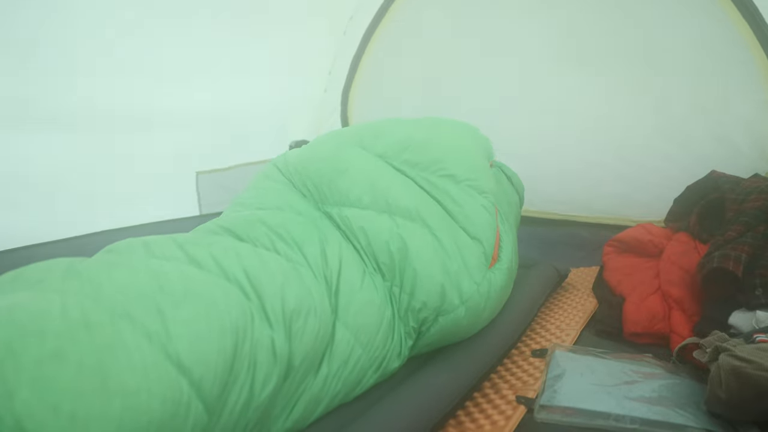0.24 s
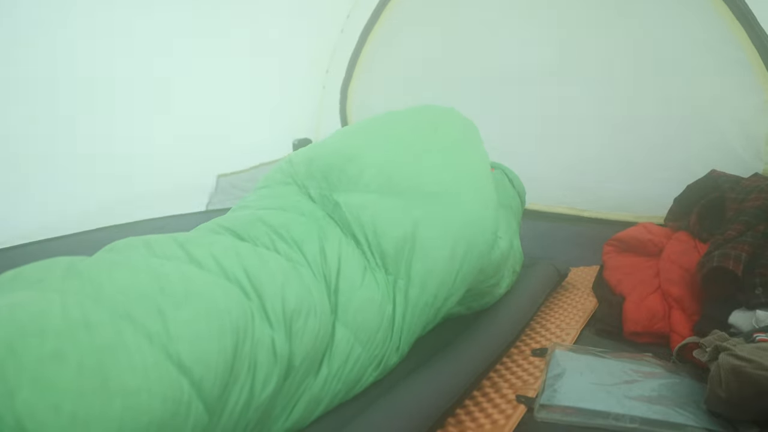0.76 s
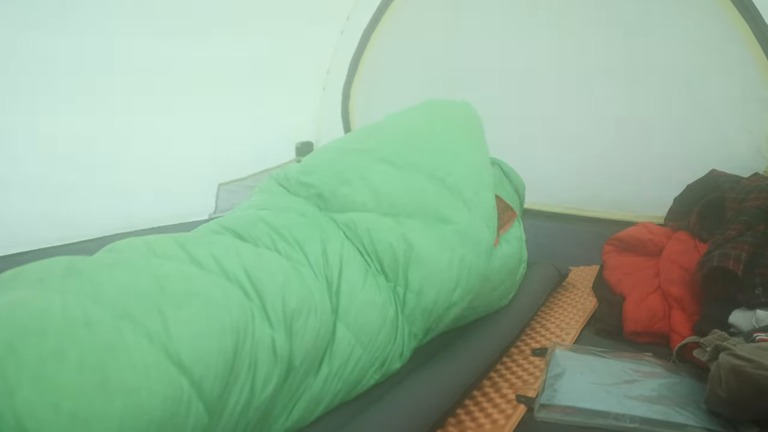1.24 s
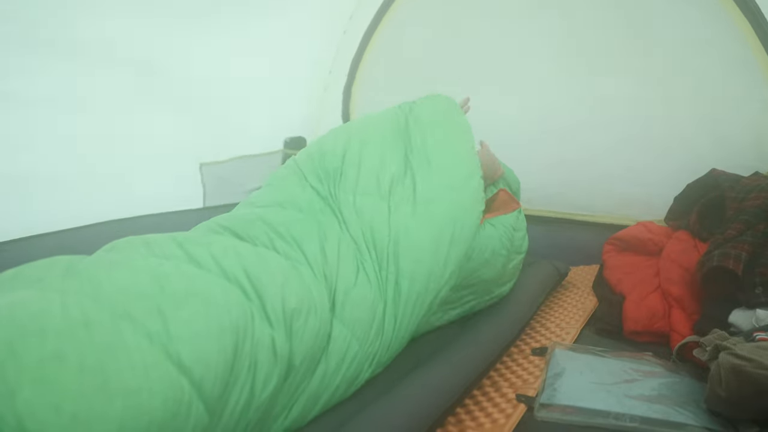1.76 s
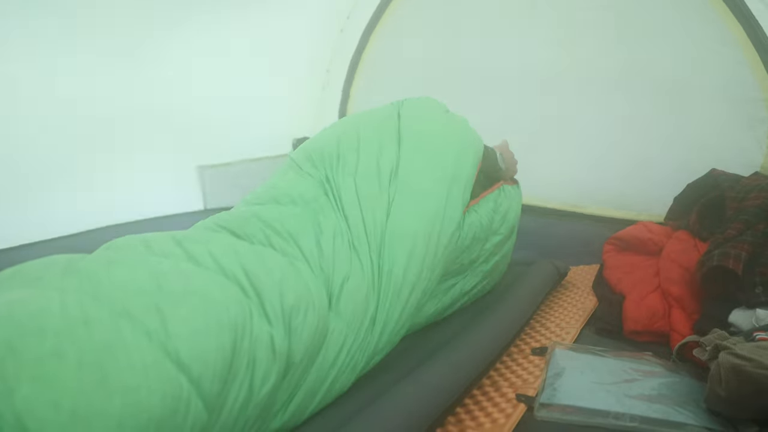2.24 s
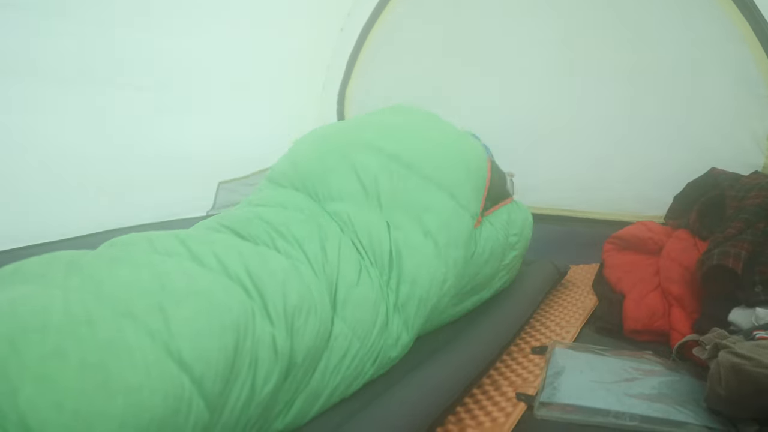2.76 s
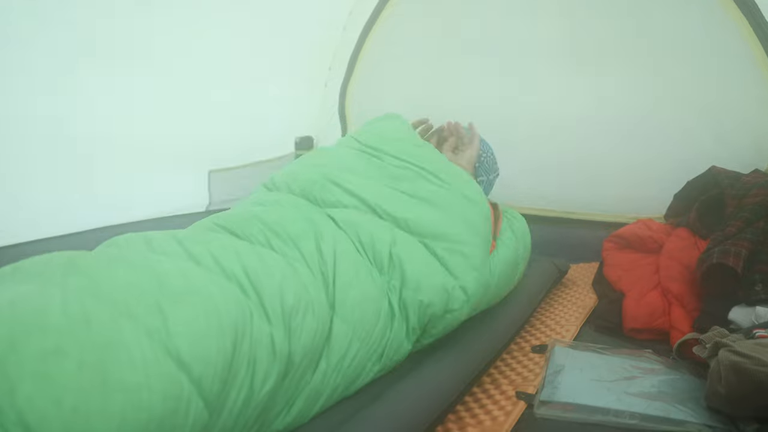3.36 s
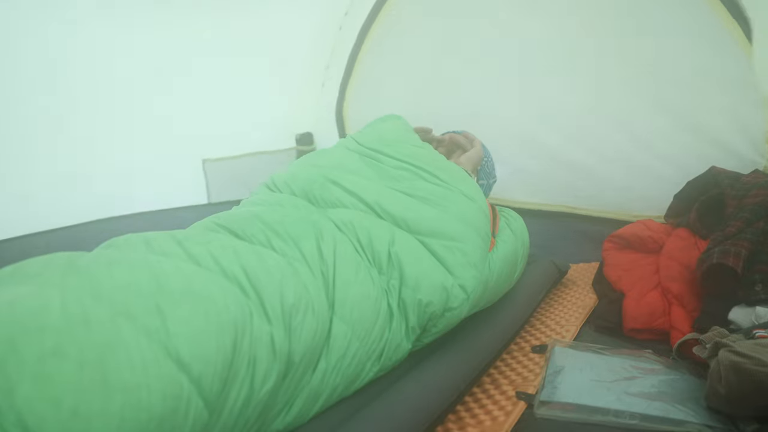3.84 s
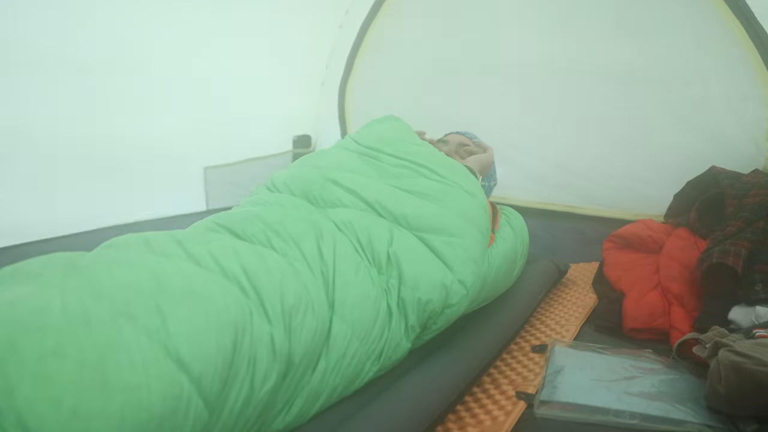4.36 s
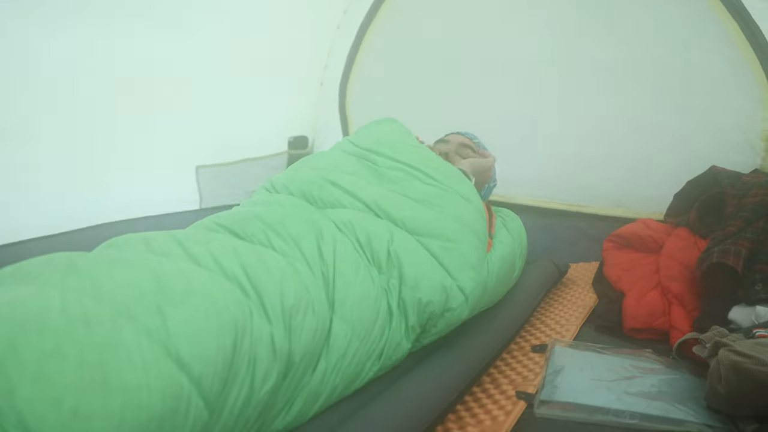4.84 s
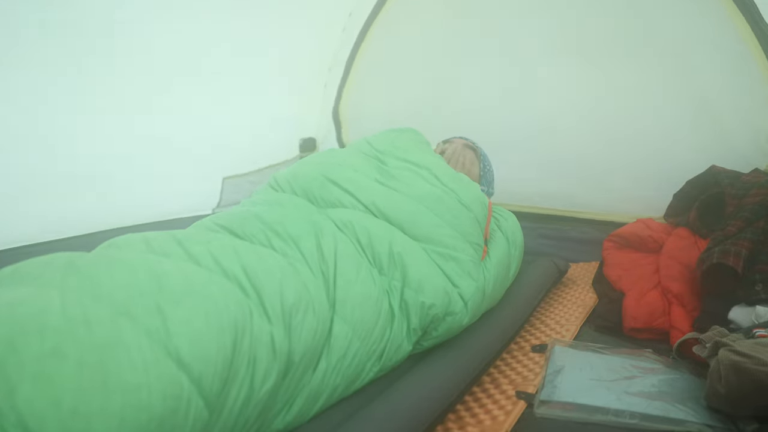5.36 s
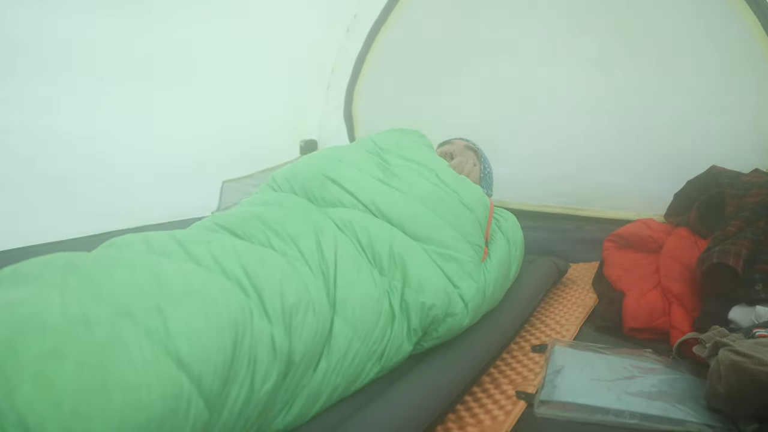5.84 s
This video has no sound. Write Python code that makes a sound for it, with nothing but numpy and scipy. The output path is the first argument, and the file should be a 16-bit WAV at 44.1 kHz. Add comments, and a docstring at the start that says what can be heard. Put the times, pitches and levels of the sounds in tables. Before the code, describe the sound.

Inside a tent, gusts drum on the walls with a low rumble, making the fabric flap and crackle and small zip pulls rattle.

```python
"""Strong wind rumbles against a tent, heard from inside, while the nylon flaps, rustles and snaps taut.
Gusts drum on the walls and make them heave, pumping the air too slowly to hear as a tone.
Metal zip pulls tinkle, cloth squeaks on a pole and a sleeping bag brushes over the mat.
Behind it all is a faint wash of wind outside. A small microphone with two openings gives left and right."""
import sys
import numpy as np
from scipy import signal
from scipy.fft import rfft, irfft, next_fast_len
from scipy.io import wavfile
from scipy.ndimage import uniform_filter1d

SR = 44100
rng = np.random.default_rng(int(sys.argv[2]) if len(sys.argv) > 2 else 0)


def transcribe(u):
    """Save the signal u as a 16-bit wav file named by the first command-line argument.

    u: samples, shape (n,) or (channels, n), limited to [-1, 1]; the rate is SR.
    q: integer samples, one column per channel.
    """
    v = np.clip(np.atleast_2d(u).T, -1, 1)
    q = np.round(v * 32767).astype(np.int16)
    wavfile.write(sys.argv[1], SR, q)


N = 268789

# Tone colours of the noises. Each row: frequency in Hz, relative strength in dB.
RUMBLE_COLOUR = [(11, -63), (18, -16), (25, -15), (43, -14.5), (140, -28), (180, -105), (310, -120)]  # deep drumming of the wind
THUD_COLOUR = [(65, -53), (110, 4.5), (279, -4), (474, -19), (550, -17.5), (720, -20), (1210, -120)]  # thudding cloth
RUSTLE_COLOUR = [(260, -4.5), (450, -1.5), (639, -6), (800, -3), (1000, -7.5), (1970, -12), (3300, -20),
                 (4290, -27), (7260, -120)]  # middle range of the moving nylon
HISS_COLOUR = [(800, -39), (1650, 1), (2800, -6.5), (5100, -3), (9500, -2), (11500, -5.5), (12600, -41),
               (14000, -52)]  # its treble
TOP_HISS_COLOUR = [(8000, -55), (10500, -58), (12000, -4), (13500, -12), (15000, -12), (15800, -31),
                   (17000, -60)]  # its very highest treble
SWAY_COLOUR = [(1, -20), (3, 0), (8, 0), (16, -6), (24, -20), (40, -60), (80, -140)]  # slowly swaying walls
WASH_COLOUR = [(300, -23), (600, -9), (2000, -7), (4000, -21), (10000, -17), (12500, -22), (15500, -32)]  # outside wind, heard through the walls
# How alike the two sides of a noise are. Each row: frequency in Hz, likeness (1 same, 0 unrelated).
SIDE_LIKENESS = [(60, 0.94), (130, 1), (290, 0.84), (640, 0.25), (1410, -0.066), (3100, -0.21),
                 (6820, 0.23), (15000, -0.35)]
# Wind drumming on the walls. Each row: time in seconds, rumble level in dB.
GUST_LEVELS = [(0.0, -43), (0.69, -41.5), (0.81, -35), (0.94, -43.5), (1.16, -36.5), (1.92, -38.5),
               (2.0, -28.5), (2.19, -38.5), (2.84, -39.5), (3.11, -42), (3.25, -39.5), (3.63, -31.5),
               (3.78, -37), (3.95, -35), (4.47, -38), (4.54, -38), (5.52, -38.5), (6.04, -38.5)]
# Single shoves of wind that swell the rumble. Each row: middle in seconds, length in seconds, level in dB.
BUFFETS = [(0.056, 0.035, -62), (0.576, 0.15, -30), (0.956, 0.07, -32.5), (1.288, .07, -53),
           (1.456, 0.069, -53), (1.83, .09, -37), (1.91, 0.058, -32), (2.006, 0.067, -40),
           (2.157, 0.19, -38.5), (2.274, 0.18, -31.5), (3.272, 0.083, -31.5), (3.54, .08, -33),
           (3.712, 0.044, -32), (3.855, 0.069, -25), (4.174, 0.29, -35.5), (4.538, 0.13, -26),
           (5.03, .06, -34.5), (5.995, 0.11, -37.5)]
# Dull flaps of cloth. Each row: start in seconds, level in dB, centre frequency in Hz.
FLAPS = [(0.554, -30, 185), (1.056, -23, 187), (1.834, -27, 188), (2.003, -27.5, 214), (2.154, -29.5, 190),
         (2.22, -34, 240), (3.079, -37.5, 196), (3.16, -29.5, 172), (3.236, -25.5, 201), (3.61, -30.5, 175),
         (3.823, -29, 244), (3.911, -31.5, 220), (4.152, -45, 196), (4.197, -31.5, 176), (4.48, -23.5, 147),
         (4.618, -26.5, 315), (4.693, -29, 164), (4.53, -31, 200), (5.004, -27, 196), (5.25, -31, 190),
         (5.392, -55, 230), (5.704, -29, 194)]
# Nylon in constant motion. Each row: time in seconds, rustle level in dB, hiss level in dB.
CLOTH_LEVELS = [(0.0, -73, -69.5), (0.39, -60, -70.5), (0.64, -47, -57.5), (0.96, -55.5, -65),
                (1.56, -56, -61), (1.97, -48.5, -60.5), (2.36, -51, -62), (2.59, -64.5, -62.5),
                (2.95, -60, -64.5), (3.15, -67, -63), (3.43, -57, -66), (3.71, -50.5, -54.5),
                (4.21, -56, -65.5), (4.43, -55, -58.5), (4.99, -58.5, -69), (5.43, -58, -62),
                (5.92, -60, -71), (6.09, -55.5, -63)]
# Nylon rubbing on nylon. Each row: middle in seconds, length in seconds, rustle level in dB,
# hiss level in dB, left minus right in dB.
STROKES = [(0.144, 0.079, -61, -61.5, 0), (0.267, 0.043, -52.5, -69, 0), (0.33, 0.03, -55, -64, -2),
           (.43, 0.056, -54, -59.5, 1), (0.563, 0.058, -41, -54, -6), (0.67, 0.039, -46, -63, -1),
           (0.801, .06, -45, -56.5, -1), (0.925, 0.023, -55, -75, 2), (1.063, 0.025, -45.5, -77, 1),
           (1.197, 0.1, -53, -65, -2), (1.54, 0.025, -45.5, -63, -4), (1.77, 0.06, -47, -74, -1),
           (1.857, 0.074, -44, -58, -2), (1.95, 0.11, -58, -58, 2), (2.147, 0.17, -62, -59.5, 4),
           (2.217, 0.072, -44.5, -50, 3), (2.308, .04, -48.5, -56.5, 4), (2.36, 0.046, -54.5, -58, -3),
           (2.49, 0.17, -50, -55, 1), (2.78, 0.25, -55.5, -81, -1), (3.142, 0.078, -51, -76, 1),
           (3.241, 0.061, -52.5, -75, -4), (3.325, 0.07, -48.5, -62, 0), (3.534, 0.084, -41.5, -49.5, -1.5),
           (3.618, 0.13, -48, -69, 1), (3.724, 0.057, -60, -62, 7), (3.798, 0.022, -57, -48.5, -2),
           (3.858, 0.043, -39.5, -52, -3.5), (3.933, 0.051, -50.5, -52.5, -1), (4.078, 0.041, -50, -58, 2),
           (4.195, 0.069, -46, -52.5, -1), (4.274, 0.06, -52, -63.5, -2), (4.454, 0.066, -65, -57, -1),
           (4.525, 0.057, -43, -56.5, 1), (4.588, 0.11, -46.5, -53.5, -0.5), (4.862, 0.03, -53, -59, -2),
           (5.003, 0.055, -49.5, -58, 0), (5.056, .04, -68, -62, -2), (5.257, 0.084, -58, -63, 2),
           (5.462, 0.031, -50, -57.5, -2), (5.677, 0.069, -51.5, -56.5, -2.5),
           (5.545, 0.076, -56.5, -63, 1), (5.89, 0.021, -55, -60, -1), (5.998, 0.12, -55.5, -61, 0)]
# Cloth snapping taut. Each row: start in seconds, then the levels of the crack, the bright tick and
# the lower body in dB, then left minus right in dB.
SNAPS = [(0.159, -49, -71, -49, 1), (0.3182, -56, -64, -46, -2.5), (0.5347, -45, -56, -51, -4),
         (0.5575, -35.5, -44.5, -53, -8), (0.6469, -53, -52, -34.5, 5), (1.058, -62, -50.5, -41.5, -2),
         (1.1782, -49, -45, -41.5, 1), (1.3443, -44, -48.5, -68, 2), (1.3603, -46, -60, -61, -1.5),
         (1.5254, -56, -65, -42.5, 3), (1.5334, -43, -59, -42, 2), (1.6233, -49, -68, -45, -7),
         (1.8354, -62, -52, -31, -6), (1.914, -42, -59, -50, -2.5), (1.9794, -56, -50, -45.5, 4),
         (2.1144, -52, -53, -54, 6), (2.1824, -32, -43, -51, 0), (2.2169, -33.5, -38.5, -59, -4),
         (2.2747, -57, -47, -61, 3), (2.3074, -63, -63, -33.5, -9), (2.5421, -53, -59, -46.5, -16),
         (2.6559, -52, -52, -44.5, -4), (2.7043, -61, -47, -43.5, -1), (2.832, -45.5, -56, -49, 9),
         (3.2111, -48, -48, -60, 0), (3.4271, -55, -64, -44, -5), (3.4774, -44.5, -61, -45, 6),
         (3.5034, -45, -43, -60, 0), (3.5254, -37, -37, -33.5, -1), (3.6154, -56, -49, -47, -3),
         (3.7244, -39.5, -61, -52, -1), (3.7884, -40, -46.5, -56, -5), (3.8184, -58, -52, -55, 1),
         (3.8504, -39, -56, -53, -4), (3.8631, -39, -59, -54, -1), (4.0682, -63, -56, -36, -6),
         (4.1944, -41, -48, -47, 0), (4.3054, -59, -55, -61, 3), (4.5084, -57, -58, -36.5, 7),
         (4.5321, -45, -55, -44, 4), (4.5775, -31.5, -44, -42, -8), (4.8015, -53, -62, -53, -6),
         (4.8658, -55, -60, -49, -3), (5.006, -46, -48, -39, 3), (5.0634, -50, -55, -63, 4),
         (5.2694, -48, -50, -66, 0), (5.4565, -39, -58, -52, 0), (5.6704, -49, -57, -58, 2)]
# The tones a zip pull rings with. Each row: frequency in Hz, seconds to fade by 60 dB.
PULL_TONES = [(5550, 0.022), (8150, 0.027), (9900, 0.049), (12780, 0.052), (13760, 0.045)]
# Zip pulls rattling. Each row: start in seconds, ring strength in dB, loudest tone in Hz,
# knock level in dB, left minus right in dB.
TINKLES = [(0.3062, -57, 5550, -62, -2), (0.3294, -57, 5550, -70, -1.5), (0.3995, -50, 5550, -65, 3),
           (0.6644, -55, 13760, -63, -2.5), (1.327, -62, 12780, -52, 5), (1.8974, -54, 13760, -71, 0.5),
           (1.9154, -48, 13760, -66, 7), (1.925, -51, 13760, -57, 4), (2.1524, -44, 8150, -62, -4),
           (2.365, -40.5, 9900, -45, 1), (2.372, -46, 13760, -62, -1), (3.2819, -51, 8150, -61, -0.5),
           (3.3, -53, 5550, -66, 2), (3.3169, -48, 12780, -59, -1), (3.322, -52, 9900, -66, -1),
           (3.3528, -47, 12780, -46.5, -1.5), (3.5744, -44, 8150, -62, 1), (3.5848, -41, 5550, -50, 2),
           (3.6097, -43, 8150, -38.5, 0), (3.615, -47, 13760, -62, 6), (3.7653, -49, 13760, -73, -1.5),
           (3.896, -38.5, 12780, -55, 2), (3.9862, -32, 8150, -40, 0), (4.0857, -48, 12780, -48, -3),
           (4.2423, -49, 8150, -58, -1), (4.2714, -56, 8150, -65, -2), (4.6015, -37, 8150, -53, 8),
           (4.7745, -58, 12780, -68, -8), (5.7344, -53, 12780, -69, -3)]
# Cloth squeaking on a pole, one list per squeak. Each row: time in seconds, pitch in Hz, level in dB,
# step from one overtone to the next in dB.
SQUEAKS = [
    [(.105, 640, -69, -15.5), (.13, 730, -58, -17), (.16, 867, -59, -15)],
    [(2.105, 960, -60, -9), (2.12, 820, -51, -12), (2.135, 695, -53, -12)],
    [(3.705, 1527, -52, -1), (3.72, 1077, -58, -16), (3.738, 745, -43.5, -6)],
    [(.385, 1045, -63, -8), (.41, 1025, -54, -6), (.435, 866, -47.5, -9), (.45, 810, -62, -15)],
    [(.645, 552, -61, -8), (.66, 535, -43, -21), (.69, 538.4, -41, -7.5), (.72, 414, -50, -2),
     (.75, 348.5, -52, -1.5), (.79, 327, -47, -3), (.82, 324, -44, 5)],
]
# The sleeping bag on the mat. Each row: middle in seconds, length in seconds, level in dB,
# centre frequency in Hz, left minus right in dB.
BRUSHES = [(.26, .07, -65, 1390, 1), (.79, 0.052, -46.5, 1320, 0), (2.19, 0.17, -55.5, 2240, 1),
           (2.47, 0.085, -56, 1380, -1), (2.76, 0.055, -48, 755, 2), (3.33, 0.084, -56.5, 1520, 5),
           (4.27, 0.067, -56, 824, 7), (4.655, .05, -53, 900, -2)]
# Big swings of a wall. Each row: start in seconds, strength in dB, swing rate in Hz,
# direction (+1 inwards, -1 outwards).
HEAVES = [(0.493, -10.5, 8, 1), (1.77, -5, 5.83, -1), (2.171, -16, 6.65, 1), (3.52, -1.5, 6.8, 1),
          (3.848, -1, 7.1, -1), (4.39, -9, 5.2, -1), (4.694, -12, 8.5, 1)]
# Small sway of the walls. Each row: time in seconds, level in dB, left minus right in dB.
SWAY_LEVELS = [(0, -15.5, -1), (.35, -39, -10), (.7, -24.5, -9), (1.5, -24.5, 4.5), (1.85, -27, 0),
               (2.5, -21, -2.5), (3.1, -35.5, 1), (3.4, -23, 1.5), (3.75, -18.5, -2), (4.15, -20, -4),
               (4.6, -24, 3), (5.3, -23, -1.5), (5.7, -27.5, -2.5), (6.09, -15.5, -1)]

THUD_DB, WASH_DB = -8, -64  # thud compared with the rumble at its average level; level of the wash
CLOTH_PAN_DB, TOP_HISS_DB = -1, -11.5  # left minus right; highest treble compared with the main hiss
# Small random snaps: crack, tick and body compared with the rustle, then left minus right.
SMALL_SNAP_DB, SMALL_SPREAD_DB = [-4, -4, 2.5, 11], [1.4, 8.7, 3, 3]  # averages; random spread
OTHER_TONES_DB, OTHER_SPREAD_DB = -21, 3  # a pull's other tones compared with its loudest; random spread
TREBLE_LIMIT_HZ = 15700


def gusts():
    """Wind drums on the walls: a deep rumble, with a thud of cloth that partly follows its level."""
    rumble_db = swells(*curves(GUST_LEVELS), *np.transpose(BUFFETS))
    thud_db = THUD_DB + rumble_db - 0.24 * (rumble_db - rumble_db.mean())
    rumble = noise(RUMBLE_COLOUR, size=4096, patchy_db=4.0, flicker_db=-0.2)
    thud = noise(THUD_COLOUR, size=1024, patchy_db=0.5, flicker_db=1.5)
    return gain_of(rumble_db) * rumble + gain_of(thud_db) * thud


def flaps():
    """The cloth flaps: each flap is a short, dull puff of low noise."""
    out = np.zeros((2, N))
    for start, db, hz in FLAPS:
        white = rng.standard_normal((2, 4096))
        white = white[0] + 0.16 * white  # nearly the same on both sides
        add(out, start, gain_of(db) * puff(white, hz, octaves=0.53, rise_s=0.0059, fade_s=0.074))
    return out


def rustling_nylon():
    """Moving nylon rustles, hisses and crackles, and swells each time it rubs on itself."""
    rustle_db, hiss_db = curves(CLOTH_LEVELS)
    middle, length, stroke_db, swish_db, pan_db = np.transpose(STROKES)
    rustle = noise(RUSTLE_COLOUR, size=512, patchy_db=3.0, flicker_db=1.5)
    rustle += 0.31 * creases(RUSTLE_COLOUR, per_second=300, spread_db=4.7)
    hiss = noise(HISS_COLOUR, size=256, patchy_db=2.0, flicker_db=2.0)
    hiss += 0.67 * creases(HISS_COLOUR, per_second=400, spread_db=1.5)
    hiss += gain_of(TOP_HISS_DB) * noise(TOP_HISS_COLOUR, size=256, patchy_db=1.5, flicker_db=2.5)
    out = np.zeros((2, N))
    for sound, base_db, swell_db in (rustle, rustle_db, stroke_db), (hiss, hiss_db, swish_db):
        for channel, side in enumerate((.5, -.5)):
            level_db = swells(base_db + side * CLOTH_PAN_DB, middle, length, swell_db + side * pan_db)
            out[channel] += gain_of(level_db) * sound[channel]
    return out


def creases(colour, per_second, spread_db):
    """Tiny creases pop at random, making scattered clicks of unequal size."""
    sizes = gain_of(spread_db * np.minimum(rng.exponential(1, (2, N)), 5))
    hits = sizes * (rng.random((2, N)) < per_second / SR)
    hits = hits + 1.7 * hits[::-1]  # each pop reaches both sides, one more strongly
    click = rng.standard_normal((2, 256)) * np.exp(-np.arange(256) / 25.0)
    pops = signal.oaconvolve(hits, click, axes=1)[:, :N]
    span = next_fast_len(N)
    tone_gain = gain_of(look_up(colour, np.fft.rfftfreq(span, 1 / SR)))
    return evened(irfft(rfft(pops, span) * tone_gain, span)[:, :N])


def snaps():
    """Cloth pulls taut with a crack, a bright tick and a lower body; small snaps fall at random times."""
    out = np.zeros((2, N))
    rustle_db, _ = curves(CLOTH_LEVELS)
    when = rng.integers(N, size=24)
    small_snaps = np.c_[when / SR, SMALL_SNAP_DB + SMALL_SPREAD_DB * rng.standard_normal((24, 4))]
    small_snaps[:, 1:4] += rustle_db[when, None]
    for start, crack_db, tick_db, body_db, pan_db in [*SNAPS, *small_snaps]:
        crack, tick, body = rng.standard_normal((3, 2, 2048))
        body = body[0] + 1.4 * body  # partly shared by both sides
        snap = gain_of(crack_db) * puff(crack, hz=1840, octaves=0.54, rise_s=0.00079, fade_s=0.028)
        snap += gain_of(tick_db) * puff(tick, hz=4050, octaves=0.48, rise_s=0.00034, fade_s=0.038)
        snap += gain_of(body_db) * puff(body, hz=660, octaves=0.7, rise_s=0.0006, fade_s=0.028)
        add(out, start, sides(pan_db) * snap)
    return out


def zip_pulls():
    """A metal pull knocks, then bounces quickly and unevenly; each bounce rings the same tones."""
    out, t = np.zeros((2, N)), np.arange(4096) / SR
    for start, ring_db, loudest_hz, knock_db, pan_db in TINKLES:
        when, size = rng.random((2, 2, 14))  # 14 bounces a side, later ones tending to be weaker
        bounces = np.zeros((2, 4096))  # each microphone opening hears the pulls from its own angle
        np.put_along_axis(bounces, (when * 0.023 * SR).astype(int), (1.3 - when) * (size - .5), axis=1)
        bounces[:, 0] = 0.2  # the first hit
        tones_db = ring_db + OTHER_TONES_DB + OTHER_SPREAD_DB * rng.standard_normal(len(PULL_TONES))
        tones_db[np.argmin(abs(np.transpose(PULL_TONES)[0] - loudest_hz))] = ring_db
        ring = sum(gain_of(db - 60 * t / fade_s) * np.sin(2 * np.pi * hz * t)
                   for (hz, fade_s), db in zip(PULL_TONES, tones_db))
        rattle = signal.fftconvolve(bounces, ring[None], axes=1)[:, :4096]
        knock = puff(rng.standard_normal((2, 4096)), hz=9100, octaves=0.58, rise_s=.0001, fade_s=0.03)
        add(out, start, sides(pan_db) * (rattle + gain_of(knock_db) * knock))
    return out


def squeaks():
    """Cloth sticks and slips on a pole: a wobbly pitch whose overtones grow as the slips sharpen."""
    out = np.zeros(N)
    for rows in SQUEAKS:
        times, *values = np.transpose(rows)
        t = np.arange(times[0], times[-1], 1 / SR)
        hz, level_db, step_db = (np.interp(t, times, v) for v in values)
        wobble = 0.63 * uniform_filter1d(rng.standard_normal(len(t)), size=150)
        cycles = np.cumsum(hz * (1 + wobble)) / SR
        slips = sum(gain_of(step_db * k) * np.cos(2 * np.pi * (k + 1) * cycles) for k in range(5))
        slips /= np.sqrt(sum(gain_of(2 * step_db * k) for k in range(5)) / 2)  # keeps the power even
        add(out, times[0], gain_of(level_db) * slips * signal.windows.tukey(len(t), .15))
    return sides(pan_db=-3) * out


def sleeping_bag():
    """The bag brushes over the mat: soft swells of noise with one broad, hollow resonance."""
    out, t = np.zeros((2, N)), np.arange(-8192, 8192) / SR
    for middle, length, db, hz, pan_db in BRUSHES:
        hollow = band(rng.standard_normal((2, len(t))), hz, octaves=0.31)
        swell = np.exp(-(2 * t / length) ** 4)
        add(out, middle + t[0], sides(pan_db) * gain_of(db) * hollow * swell)
    return out


def heaving_walls():
    """The walls pump the air inside, mostly below hearing: a random sway and a few big, dying swings."""
    sway_db, pan_db = curves(SWAY_LEVELS)
    sway = noise(SWAY_COLOUR, size=32768, patchy_db=-0.5, flicker_db=0.5) * gain_of(sway_db)
    swings, t = np.zeros(N), np.arange(SR // 2) / SR
    for start, db, hz, direction in HEAVES:
        cycles = hz * t
        rise_and_fall = (1 - np.exp(-cycles / 0.2)) * np.exp(-(cycles / 0.87) ** 4)
        add(swings, start, direction * gain_of(db) * np.sin(2 * np.pi * cycles) * rise_and_fall)
    return (sway + swings) * sides(pan_db)


def outside_wind():
    """The wind outside comes through the walls as a faint, flickering wash."""
    return gain_of(WASH_DB) * noise(WASH_COLOUR, size=512, patchy_db=1.0, flicker_db=6.0)


def noise(colour, size, patchy_db, flicker_db):
    """Stereo noise made in frames of `size` samples; its level wavers in patches and as a whole."""
    frames, hz = 4 * N // size + 5, np.fft.rfftfreq(size, 1 / SR)
    a, b, c, d, patches = (rng.standard_normal((frames, len(hz))).T for _ in range(5))
    patches = evened(uniform_filter1d(uniform_filter1d(patches, size=8, axis=0), size=6, axis=1))
    flicker = evened(uniform_filter1d(rng.standard_normal(frames), size=5))
    likeness = np.clip(look_up(SIDE_LIKENESS, hz), -1, 1)[:, None]
    left = a + 1j * b
    right = likeness * left + np.sqrt(1 - likeness ** 2) * (c + 1j * d)
    level_db = look_up(colour, hz)[:, None] + patchy_db * patches + flicker_db * flicker
    spectra = np.array([left, right]) * gain_of(level_db)
    return evened(signal.istft(spectra, nperseg=size, noverlap=3 * size // 4)[1][:, :N])


def band(white, hz, octaves):
    """Keeps the part of a white noise around hz; `octaves` sets how wide that part is."""
    f = np.fft.rfftfreq(white.shape[-1], 1 / SR)
    return evened(irfft(rfft(white) * np.exp(-.5 * (np.log2((f + 1) / hz) / octaves) ** 2)))


def puff(white, hz, octaves, rise_s, fade_s):
    """A burst of noise around hz that rises fast and fades by 60 dB in fade_s seconds."""
    t = np.arange(white.shape[-1]) / SR
    return band(white, hz, octaves) * (1 - np.exp(-t / rise_s)) * gain_of(-60 * t / fade_s)


def swells(base_db, middle, length, db):
    """A level in dB over time: bell-shaped swells add their power to a slowly changing base."""
    t = np.arange(0, N + 64, 64) / SR
    bells = gain_of(db[:, None]) ** 2 * np.exp(-(2 * (t - middle[:, None]) / length[:, None]) ** 2)
    return 10 * np.log10(gain_of(base_db) ** 2 + np.interp(np.arange(N) / SR, t, bells.sum(0)))


def gain_of(db):
    """Turns decibels into a number to multiply by."""
    return 10 ** (np.asarray(db) / 20)


def evened(x):
    """Scales a signal to an average power of 1."""
    return x / np.sqrt(np.mean(x ** 2) + 1e-20)


def look_up(rows, hz):
    """Reads a frequency table at hz, joining its rows on a scale of octaves."""
    f, value = np.transpose(rows)
    return np.interp(np.log(hz + 1), np.log(f + 1), value)


def curves(rows):
    """Joins the rows of a time table with straight lines, giving values at every sample."""
    times, *values = np.transpose(rows)
    return [np.interp(np.arange(N) / SR, times, v) for v in values]


def sides(pan_db):
    """Left and right gains that make the left pan_db louder than the right."""
    return gain_of(np.vstack([pan_db / 2, -pan_db / 2]))


def add(mix, start, sound):
    """Adds a sound to the mix, `start` seconds in."""
    part = mix[..., round(start * SR):][..., :sound.shape[-1]]
    part += sound[..., :part.shape[-1]]


def scene():
    """All the sounds together, as they reach the microphone."""
    return (squeaks() + heaving_walls() + gusts() + outside_wind() + flaps()
            + rustling_nylon() + snaps() + sleeping_bag() + zip_pulls())


def record(dry):
    """The recorder cuts off the very highest treble."""
    low_pass = signal.firwin(1023, TREBLE_LIMIT_HZ, window=("kaiser", 9), fs=SR)
    return signal.oaconvolve(dry, low_pass[None], "same", axes=1)


dry = scene()
out = record(dry)
transcribe(out)
```